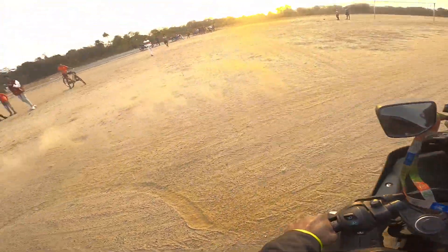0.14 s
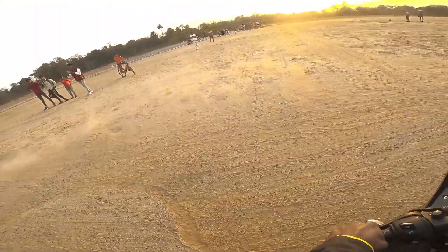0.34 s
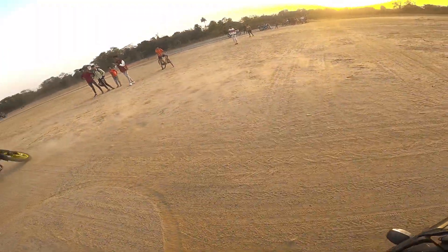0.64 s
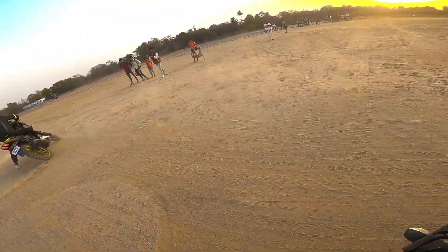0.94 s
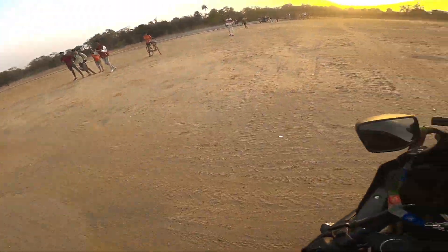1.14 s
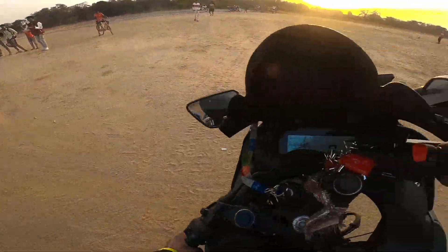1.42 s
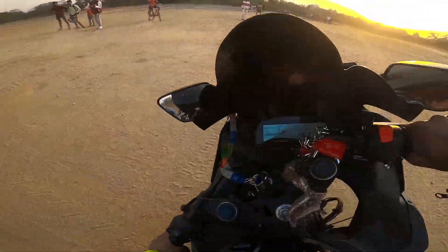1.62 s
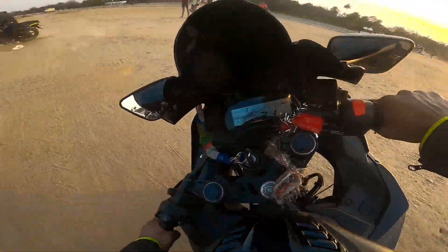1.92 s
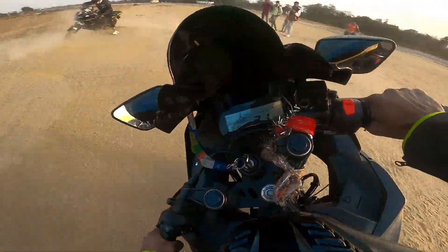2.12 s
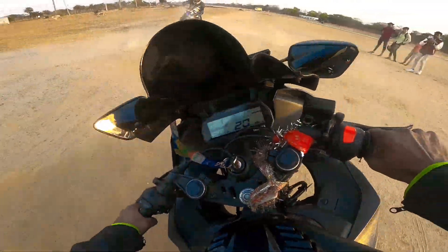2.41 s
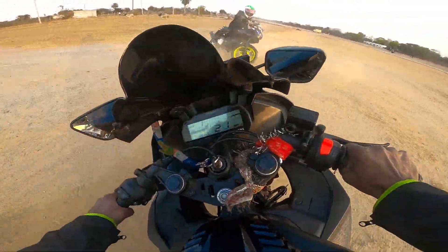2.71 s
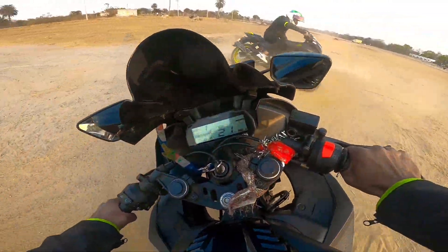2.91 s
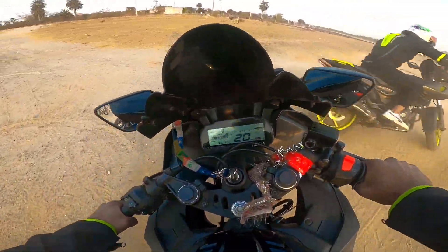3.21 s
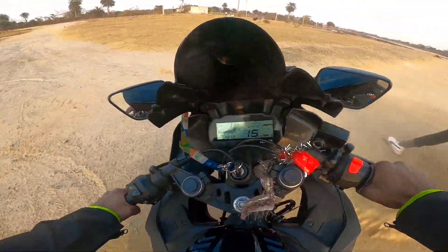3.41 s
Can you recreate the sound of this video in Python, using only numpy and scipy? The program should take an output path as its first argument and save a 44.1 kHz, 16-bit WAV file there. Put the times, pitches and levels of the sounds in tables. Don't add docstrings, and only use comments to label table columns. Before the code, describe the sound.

Single-cylinder motorcycle engine chugs on open dirt, broken by loose-plug crackle and near silence, then swells back.

```python
import sys
import numpy as np
from scipy import signal
from scipy.fft import rfft, irfft
from scipy.io import wavfile
from scipy.ndimage import uniform_filter1d

SR = 44100
rng = np.random.default_rng(int(sys.argv[2]) if len(sys.argv) > 2 else 0)


def transcribe(signal):
    frames = np.atleast_2d(signal).T
    limited = np.clip(frames, -1, 1)
    pcm = np.round(limited * 32767).astype(np.int16)
    wavfile.write(sys.argv[1], SR, pcm)


def boost(x):
    u = np.asarray(x, float) / 20
    return 10 ** u


N = 156555
T = np.arange(N) / SR
LOST_S, BACK_S = .312, 1.389
RAIL = .9


def rms_one(x):
    return x / np.sqrt(np.mean(x ** 2) + 1e-20)


def in_time(rows):
    s, *columns = np.transpose(rows)
    return [np.interp(T, s, column) for column in columns]


def low(x, hz, order=2):
    return signal.sosfilt(signal.butter(order, hz, fs=SR, output="sos"), x)


def drift(hz):
    return rms_one(low(rng.standard_normal(N + SR), hz)[SR:])


def pipes(x, table):
    out = 0
    for k, (hz, width, db) in enumerate(table):
        r = np.exp(-np.pi * width / SR)
        ringing = signal.lfilter([1, 0, -1], [1, -2 * r * np.cos(2 * np.pi * hz / SR), r * r], x)
        out = out + (-1) ** k * boost(db) * rms_one(ringing)
    return rms_one(out)


def coloured(x, spectrum):
    hz, db = np.transpose(spectrum)
    f = np.arange(N // 2 + 1) * SR / N + 1
    gain = boost(np.interp(np.log(f), np.log(hz), db))
    return rms_one(irfft(rfft(x) * gain, N))


def hiss():
    edge = signal.ellip(12, 1, 60, 15750, fs=SR, output="sos")
    return signal.sosfilt(edge, rng.standard_normal(N))


def firings(turns, spread_db):
    passed = np.diff(np.floor(turns), prepend=0) > 0
    return passed * boost(spread_db * rng.standard_normal(N))


# t/s, f/Hz
ENGINE_SPEED = [(1.4, 36.4), (1.58, 41.5), (1.75, 44.2), (2.09, 40.7), (2.24, 37.9), (2.3, 38.2),
                (2.51, 41.4), (2.7, 42.7), (2.93, 41.1), (3.07, 39.3), (3.15, 37.0), (3.32, 38.1),
                (3.5, 35.0), (3.55, 34.7)]


def engine_turns():
    first_hz, start_turn, jitter = 41.84, .02, .003
    hz = np.where(T < LOST_S, first_hz, in_time(ENGINE_SPEED)[0])
    return np.cumsum(hz) / SR + start_turn + jitter * drift(12)


# multiple of the firing rate, level/dB
EXHAUST_TONES = [(1, -14), (2, 2.5), (3, -1), (4, -4), (5, -4.5), (6, -1.5), (7, -1.5), (8, -9), (9, -5),
                 (10, -32.5), (11, -4.5), (12, -26), (13, -12.5), (14, -23), (15, -13), (16, -8)]
COASTING_CHANGE = [4.5, 0.2, -1.5, 2, 4, -1.5, -2.5, 1.5, 0.8, 7, -0.5, 5.5, 0, 2.5, -8, -3.5]
# t/s, t/s
THROTTLE_OPENS = (1.9, 2.2)


def exhaust_tones(turns):
    wobble_db, phase_spread = 1.1, .55
    shut = np.interp(T, THROTTLE_OPENS, [1, 0])
    out = 0
    for (multiple, db), coasting_db in zip(EXHAUST_TONES, COASTING_CHANGE):
        phase = 0.27 + phase_spread * (rng.random() - .5)
        level = boost(db + shut * coasting_db + wobble_db * drift(12))
        out = out + level * np.sin(2 * np.pi * (multiple * turns + phase))
    return rms_one(out)


def exhaust_blows(turns):
    puff_share, soft_hz = .4, 2393
    clicks = firings(turns + .57, 1.2) + puff_share * firings(turns + .21, 3.0)
    return low(clicks, soft_hz, order=4)


# f/Hz, width/Hz, level/dB
EXHAUST_PIPES = [(616, 20, -6), (982, 52, -8), (537.4, 25, -4.5), (897, 50, -6.5)]


def pipe_ring(blows):
    return pipes(blows, EXHAUST_PIPES)


# f/Hz, width/Hz, level/dB
SILENCER_SHELL = [(1237, 53, -4.5), (1335, 70, -1), (1476, 50, -4.5), (1800, 100, -6), (2200, 250, -12.5)]
# t/s, level/dB
SILENCER_BARK = [(0, -23), (.3, -16), (1.4, -17), (2.25, -17), (2.35, -9), (2.7, -8), (2.95, -7),
                 (3.15, -11.5), (3.55, -13.5)]


def silencer_bark(blows):
    return boost(in_time(SILENCER_BARK)[0]) * pipes(blows, SILENCER_SHELL)


def airbox_ring(turns):
    hz, width_hz, lag_turns = 772.7, 62, .17
    gulps = firings(turns + .57 - lag_turns, 1.6) + .15 * firings(turns + .57, 3.0)
    for _ in range(2):
        gulps = pipes(gulps, [(hz, width_hz, 0)])
    return gulps


# f/Hz, level/dB per Hz
ROAR_COLOUR = [(29, -35), (50, -5.5), (165, -7.5), (292, -4), (428, -8), (1450, -10.5), (2820, -23.5),
               (3760, -31), (9500, -61), (15000, -82.5)]


def gas_roar(turns):
    gate_depth = 0.13
    gate = 1 + gate_depth * np.cos(2 * np.pi * turns)
    return coloured(gate * rng.standard_normal(N), ROAR_COLOUR) * boost(0.71 * drift(16.0))


def whine():
    hz, width_hz, top_hz, from_s = 7064, 900, 7450, 1.87
    band = low(pipes(rng.standard_normal(N), [(hz, width_hz, 0)]), top_hz, order=16)
    return rms_one(band) * np.clip((T - from_s) / .1, 0, 1)


# t/s, level/dB, bass/dB, airbox ring/dB
ENGINE_BEFORE = [
    (0.0, -37, 15, -4),
    (0.142, -35, 12.5, -10.5),
    (0.3, -36, 6.5, -7),
]
# t/s, level/dB, bass/dB, airbox ring/dB
ENGINE_AFTER = [(1.4, -41, -10.5, -1), (1.46, -39.5, -5, 4.5), (2.22, -30.5, 2.5, -3.5),
                (2.5, -24.5, 5, -2), (2.76, -21.5, 4.5, -1.5), (3.08, -21.5, 3, -3.5),
                (3.16, -26.5, 3.5, -1), (3.25, -26.5, 7, -1), (3.53, -28, 6, -7)]
# t/s, share
ENGINE_ROUGHNESS = [(0, .45), (.3, .45), (1.4, .15), (2.3, .09), (2.5, .08), (3.05, .1), (3.16, .45),
                    (3.55, .4)]


def engine():
    db, bass_db, ring_db = in_time(ENGINE_BEFORE + ENGINE_AFTER)
    rough, = in_time(ENGINE_ROUGHNESS)
    turns = engine_turns()
    blows = exhaust_blows(turns)
    clean = boost(2.5) * exhaust_tones(turns)
    clean = clean + boost(-5.5 - 0.61 * np.maximum(ring_db, 0)) * pipe_ring(blows)
    clean = clean + boost(-3 + ring_db) * airbox_ring(turns) + silencer_bark(blows)
    whole = (1 - rough) * clean + np.sqrt(rough) * boost(5.5) * gas_roar(turns) + boost(-45) * whine()
    bass = (boost(bass_db) - 1) * low(whole, 200, order=1)
    air = boost(-54 + .72 * db) * hiss()
    return boost(db) * (whole + bass) + air


# t/s, level/dB
PASSER_LEVEL = [(0, -32), (.12, -32.5), (.3, -29), (1.4, -65), (2.9, -41.5), (3.12, -27), (3.3, -22.5),
                (3.55, -19.5)]
# t/s, f/Hz
PASSER_SPEED = [(0, 92.76), (.1, 98.92), (.14, 95.65), (.22, 84.44), (.3, 82.84), (2.9, 80.47),
                (3.22, 83.47), (3.28, 82.4), (3.33, 76), (3.38, 88.38), (3.43, 82.95), (3.55, 81.14)]
# f/Hz, width/Hz, level/dB
PASSER_EXHAUST = [(157.9, 120, -3), (258, 45, -10), (480, 23, -13), (670, 20, -16.5)]


def passer_thuds():
    turns = np.cumsum(in_time(PASSER_SPEED)[0]) / SR + .02 * drift(20)
    thuds = low(firings(turns, 2.6) + 0.026 * rng.standard_normal(N), 570, order=4)
    return boost(in_time(PASSER_LEVEL)[0]) * pipes(thuds, PASSER_EXHAUST)


def grit():
    dust = boost(-58) * drift(5000)
    scrub = low(np.diff(rng.standard_normal(N + 1)), 3700, order=8)
    return (dust + boost(-51) * rms_one(scrub)) * (T < LOST_S)


# t/s, height, rise/s, fall/s, scratch level/dB
PLUG_KNOCKS = [
    (.1535, .55, .002, .002, -38),
    (.1716, .95, .004, .0007, -26),
    (.174, -.12, .002, .04, -60),
    (.223, .55, .006, .035, -37),
    (.229, 0, .002, .002, -41),
    (.2415, -.55, .002, .045, -46),
    (.258, .05, .001, .003, -36),
]


def knocks():
    scratch = drift(11000) * 0.22 + drift(1600)
    out = 0
    for s, height, rise, fall, db in PLUG_KNOCKS:
        t = T - s
        hump = np.where(t < 0, np.exp(-(t / rise) ** 2), np.exp(-np.abs(t) / fall))
        out = out + height * hump
        out = out + boost(db) * scratch * np.exp(-((t + 0.0025) / .004) ** 2)
    return out * (T < LOST_S)


CRACKLE_END_S = .3343


def crackle():
    snap_s = .0002
    spit = .25 * drift(8500) * boost(4.0 * drift(400))
    volts = .45 + .35 * drift(600) + spit
    volts = np.where(T < LOST_S + 4 * snap_s, -.5, volts)
    volts = np.where(T < LOST_S + snap_s, np.pi / 2, volts)
    dying = np.clip((CRACKLE_END_S - T) / .005, .3, 1)
    chatter = RAIL * np.sin(volts) * dying * (T > LOST_S) * (T < CRACKLE_END_S)
    fading = np.exp(-np.abs(T - CRACKLE_END_S) / 0.0036) * (T > CRACKLE_END_S)
    return chatter + boost(-17.5) * drift(4000) * fading


# t/s, from turns, to turns, settle/s, hold/s, share that sags fast
INPUT_SURGES = [
    (.3347, .1, 1.25, .0011, .0065, .45),
    (1.2253, .2, 1.25, .0009, .0125, 1),
    (1.2378, .8, .25, .00025, .0013, 1),
    (1.2391, .25, -.25, .0006, .0016, .2),
]


def surges():
    dip, fast_s, slow_s = .7, .008, .046
    out = 0
    for s, start, end, settle, hold, fast in INPUT_SURGES:
        t = np.maximum(T - s, 0)
        turn = end + (start - end) * np.exp(-t / settle)
        fold = np.clip(1.1 * np.sin(2 * np.pi * turn), -1, 1)
        shrink = 1 - (1 - dip) * np.minimum(t / settle, 1)
        fold = np.where(fold < 0, fold * shrink, fold)
        late = np.maximum(t - hold, 0)
        if fast == 1:
            sag = late == 0
        else:
            sag = fast * np.exp(-late / fast_s) + (1 - fast) * np.exp(-late / slow_s)
        out = out + RAIL * fold * sag * (T > s)
    return out


def tick():
    return -.007 * (np.abs(T - .5293) < .0001)


# t/s, height
RESTING_VOLTAGE = [(.68, 0), (.72, -.032), (.78, -.058), (1.19, -.18), (1.205, -.14), (1.225, -.07),
                   (1.238, -.16), (1.2405, -.16), (1.2425, .02), (1.245, -.04), (1.27, -.02), (1.39, -.01),
                   (1.45, .052), (1.5, .06), (1.75, .05), (2.1, .08), (2.6, .092), (2.9, .085),
                   (3.55, .045)]


def input_bias():
    return uniform_filter1d(in_time(RESTING_VOLTAGE)[0], size=70)


def input_hiss():
    return boost(-79) * hiss() * (T > .68) * (T < 1.225)


# t/s, level/dB, f/Hz
CHAIN_RASP = [
    (2.95, -61.5, 2600),
    (3.1, -44.5, 2690),
    (3.33, -39.5, 2890),
    (3.55, -45, 2535),
]


def passer_rasp():
    width_hz = 190
    db, hz = in_time(CHAIN_RASP)
    phase = 2 * np.pi * np.cumsum(hz) / SR
    rasp = drift(width_hz) * np.sin(phase) + drift(width_hz) * np.cos(phase)
    return boost(db) * rasp * (T > BACK_S)


def scene():
    fade_s = .003
    contact = (T < LOST_S) + np.clip(np.minimum(T - BACK_S, T[-1] - T) / fade_s, 0, 1)
    bikes = engine() + passer_thuds() + passer_rasp()
    faults = grit() + knocks() + crackle() + surges() + tick() + input_bias()
    return np.array([contact * bikes + faults, np.zeros(N)])


def low_pass(x):
    return signal.sosfilt(signal.butter(12, 17030, fs=SR, output="sos"), x)


def record(dry):
    live_side = [[1], [0]]
    limited = np.clip(dry + input_hiss() * live_side, -RAIL, RAIL)
    top = signal.cheby2(10, 60, 17100, fs=SR, output="sos")
    mix = signal.sosfilt(top, limited)
    return low_pass(mix)


dry = scene()
out = record(dry)
transcribe(out)
```